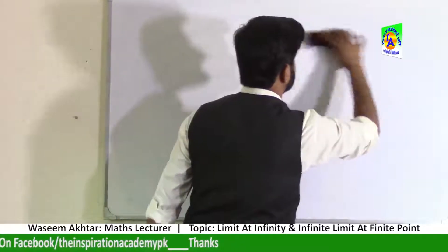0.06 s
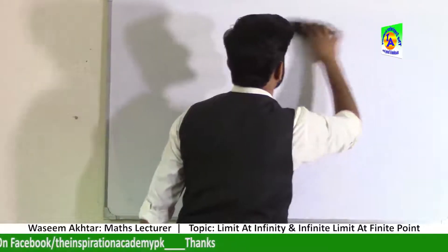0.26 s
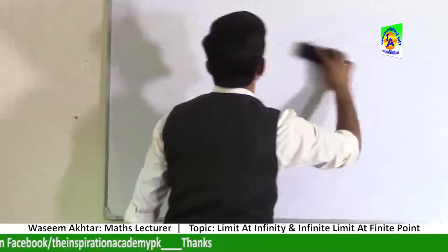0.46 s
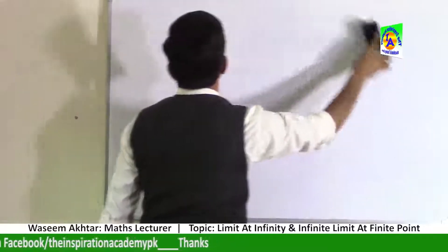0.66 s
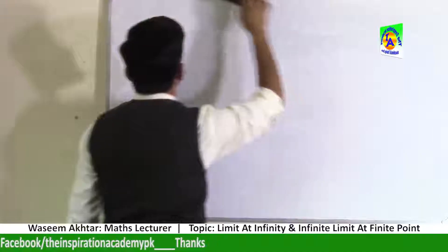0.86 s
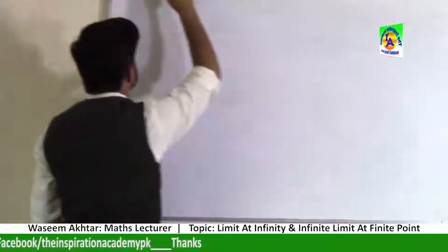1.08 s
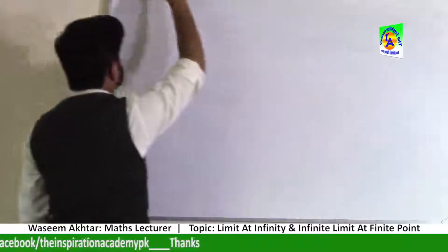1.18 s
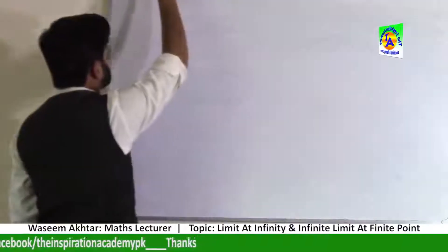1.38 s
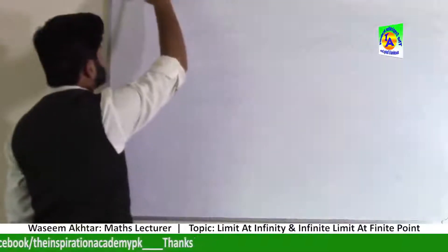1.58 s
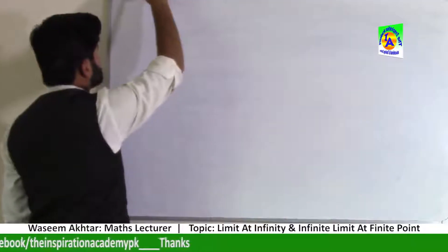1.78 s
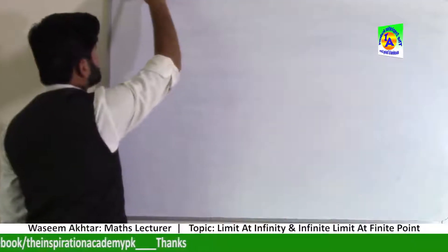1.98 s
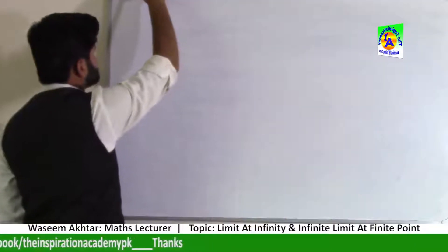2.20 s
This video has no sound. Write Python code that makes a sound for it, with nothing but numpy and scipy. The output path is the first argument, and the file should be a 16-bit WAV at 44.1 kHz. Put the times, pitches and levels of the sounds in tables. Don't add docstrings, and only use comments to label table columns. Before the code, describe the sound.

A felt eraser rubs a whiteboard in quick fizzing strokes, then one sharp hollow knock.

```python
import sys
import numpy as np
from scipy import signal
from scipy.fft import rfft, irfft, next_fast_len
from scipy.io import wavfile
from scipy.ndimage import uniform_filter1d, map_coordinates

SR = 44100
rng = np.random.default_rng(int(sys.argv[2]) if len(sys.argv) > 2 else 0)


def generate_wav(signal):
    frames = np.transpose(np.atleast_2d(signal))
    scaled = np.clip(frames, -1, 1) * 32767
    pcm = np.round(scaled).astype(np.int16)
    wavfile.write(sys.argv[1], SR, pcm)


def gain_from_db(level_db):
    decades = np.asarray(level_db, float) / 20
    return 10 ** decades


N = 98960
T = np.arange(N) / SR


def unit(x):
    return x / np.sqrt(np.mean(x ** 2) + 1e-20)


def coloured(x, response):
    size = next_fast_len(N + 8192)
    freq_hz, gain_db = np.transpose(response)
    log_hz = np.log(np.fft.rfftfreq(size, 1 / SR) + 1)
    gain = gain_from_db(np.interp(log_hz, np.log(freq_hz + 1), gain_db))
    return irfft(rfft(x, size) * gain, size)[..., :N]


def white():
    return rng.standard_normal(N)


def bell(middle_s, half_width_s):
    return np.exp(-.5 * ((T - middle_s) / half_width_s) ** 2)


def wobble(rate_hz):
    knots = rng.standard_normal(int(N * rate_hz / SR) + 4)
    return map_coordinates(knots, [T * rate_hz])


def patchy(x, patchy_db):
    z = signal.stft(x, nperseg=512)[2]
    field = uniform_filter1d(rng.standard_normal(z.shape), size=6, axis=0)
    field = uniform_filter1d(field, size=8, axis=1)
    return signal.istft(z * gain_from_db(patchy_db * unit(field)), nperseg=512)[1][:N]


# freq_hz, level_db
SIDE = [(60, -26.5), (240, -23), (950, -19), (3770, -15.5), (15000, -15)]


def wide(make):
    mid = make()
    side = coloured(make(), SIDE)
    return np.array([mid + side, mid - side])


def wide_noise(make, response):
    return unit(wide(lambda: coloured(make(), response)))


def ring(start_s, level_db, pitch_hz, t60_s, rise_s=.0004):
    t = np.maximum(T - start_s, 0)
    return gain_from_db(level_db - 60 * t / t60_s) * (1 - np.exp(-t / rise_s)) * np.sin(2 * np.pi * pitch_hz * t)


def felt_grains():
    grains_per_s, grain_db, grain_share = 5000, 3.5, 0.54
    draw = rng.random((2, N))
    size = gain_from_db(-grain_db * np.log(draw[1] + 1e-4))
    slips = (draw[0] < grains_per_s / SR) * size * rng.choice([-1, 1], N)
    return patchy(grain_share * unit(slips) + white(), patchy_db=1.5)


# time_s, effort_db
RUB = [
    (0, -48),
    (.075, -49),
    (.16, -56),
    (.24, -50.5),
    (.31, -55),
    (.53, -53.5),
    (.595, -54),
    (0.689, -53),
    (0.869, -81.5),
]
# middle_s, half_width_s, level_db
SCUFFS = [
    (0.126, 0.0055, -44),
    (.341, 0.0079, -42),
]
# freq_hz, density_db
FELT = [(2350, -23), (4000, -11.5), (4750, -15.5), (5390, -10), (5880, -12.5), (6830, -4), (9640, 0.5),
        (13600, -2), (15800, -14)]
# freq_hz, density_db
SCUFF = [(4500, -24), (5600, -7.5), (7000, -1.5), (9500, -3), (13500, 0.5), (15800, -4)]
# freq_hz, density_db
SQUEAK = [(4200, -30), (5000, -3), (5400, 0), (5900, -6), (6500, -30)]
# freq_hz, density_db
BOARD = [(290, -29.5), (500, -13.5), (578, -8.5), (742, -11), (1190, -0.5), (2350, -4), (6000, -9),
         (7800, -34), (13200, -120)]


def rubbing():
    time_s, stroke_db = np.transpose(RUB)
    effort_db = np.interp(T, time_s, stroke_db, right=-120) + 0.83 * wobble(30.3)
    scuffs = np.zeros(N)
    for middle_s, half_width_s, level_db in SCUFFS:
        effort_db = effort_db - 0.5 * bell(middle_s - 0.021, 0.013)
        scuffs = scuffs + gain_from_db(level_db) * bell(middle_s, half_width_s)

    fizz = wide_noise(felt_grains, FELT) * gain_from_db(effort_db)
    fizz = fizz + wide_noise(felt_grains, SCUFF) * scuffs
    squeak_db, squeak_end_s, squeak_fade_s = -64.5, 0.14, 0.078
    squeak_fall = np.clip((squeak_end_s - T) / squeak_fade_s, 0, 1)
    squeak = wide_noise(felt_grains, SQUEAK) * gain_from_db(squeak_db) * squeak_fall

    board_db, board_follows, scuff_board_db = -69, 0.39, -22.5
    drive = gain_from_db(board_db + board_follows * (effort_db + 52.5)) * (T < time_s[-1])
    board = wide_noise(felt_grains, BOARD) * np.hypot(drive, gain_from_db(scuff_board_db) * scuffs)
    return fizz + squeak + board


HISS_FALL_DB, HISS_FALL_S = -4.5, 1.85
# freq_hz, density_db
RUMBLE = [(12, -54), (20, -15), (32, -2.5), (53, 0), (81, -13.5), (118, -6), (180, -15.5), (437, -25),
          (500, -29), (650, -45), (1100, -120)]
# time_s, level_db
RUMBLE_SWELL = [(0.0, -59.5), (0.3, -59), (0.64, -57), (0.79, -61.5), (1.02, -59), (1.3, -58.5),
                (1.54, -62.5), (2.24, -62)]
# freq_hz, density_db
HISS = [(240, -23), (400, -27.5), (512, -3), (597, -4), (1500, -6.5), (2110, -10), (12000, -17),
        (15800, -18)]
# freq_hz, gain_db
BUZZ = [(2000, -14), (4000, -7.5), (6500, -0.5), (12000, -11.5), (15800, -15)]


def noise_floor():
    rumble_db, hiss_db = 0.5, -73
    swell = gain_from_db(rumble_db + np.interp(T, *np.transpose(RUMBLE_SWELL)))
    rumble = swell * wide_noise(lambda: patchy(white(), 2.37), RUMBLE)
    fall = gain_from_db(HISS_FALL_DB * (T > HISS_FALL_S) + 0.5 * wobble(8.13))
    hiss = fall * gain_from_db(hiss_db) * wide_noise(lambda: patchy(white(), 2.27), HISS)

    buzz_start_s, mains_hz, buzz_db = .009, 100.05, -82.5
    spikes = np.zeros(N)
    at = (np.arange(buzz_start_s, T[-1], 1 / mains_hz) * SR).astype(int)
    spikes[at] = gain_from_db(2.5 * rng.standard_normal(len(at)))
    buzz = gain_from_db(buzz_db) * unit(coloured(spikes, [(500, -70.5), *BUZZ]))
    return rumble + hiss + buzz


def mains_hum():
    hum_hz, hum_db = 50, -62
    return gain_from_db(hum_db + 2.5 * wobble(19)) * np.sin(2 * np.pi * (hum_hz * T + 0.16 * wobble(11)))


# middle_s, half_width_s, level_db
SLIDES = [
    (1.248, 0.061, -71.5),
    (1.618, 0.011, -63),
    (1.68, 0.029, -67.5),
    (1.72, 0.029, -60),
]
# freq_hz, density_db
SLIDE = [(500, -15.5), (1200, 0.5), (2500, -5.5), (4000, -11), (7500, -7.5), (12000, -9.5), (15800, -14)]


def slides():
    swell = sum(gain_from_db(level_db) * bell(middle_s, half_width_s) for middle_s, half_width_s, level_db in SLIDES)
    return swell * wide_noise(lambda: patchy(white(), patchy_db=4.5), SLIDE)


# start_s, level_db, pitch_hz, t60_s
SWINGS = [
    (1.158, -48.5, 107, 0.21),
    (1.183, -42, 68.7, 0.2),
    (1.213, -36.5, 42.7, 0.23),
    (1.244, -42, 63, 0.11),
    (1.281, -42, 35.6, 0.27),
]


def thump():
    return -sum(ring(*swing, rise_s=0.003) for swing in SWINGS)


# start_s, level_db, rise_s, t60_s
THUDS = [
    (1.194, -43.5, 0.0016, 0.0094),
    (1.197, -55.5, 0.0029, .16),
    (1.612, -49.5, 0.0026, 0.096),
    (1.7224, -33, 0.0027, .05),
    (1.727, -48.5, 0.0035, 0.32),
]
# freq_hz, density_db
WOOD = [(80, -8), (250, 4.5), (600, -0.5), (1100, 2.5), (2200, -7), (3500, -19), (8000, -23.5),
        (15800, -35.5)]


def thuds():
    total = np.zeros(N)
    for start_s, level_db, rise_s, t60_s in THUDS:
        t = np.maximum(T - start_s, 0)
        shape = gain_from_db(level_db - 60 * t / t60_s) * (1 - np.exp(-(t / rise_s) ** 2))
        total = total + shape * unit(coloured(white(), WOOD))
    return total


def snap():
    start_s, level_db, t60_s = 1.1942, -49.5, 0.009
    return (T > start_s) * gain_from_db(level_db - 60 * np.abs(T - start_s) / t60_s) * white()


# start_s, level_db, pitch_hz, t60_s
TICKS = [
    (1.1945, -44, 3250, .01),
    (1.1945, -48.5, 400, .03),
    (1.612, -47.5, 257, 0.034),
    (1.6155, -49, 1050, .04),
    (1.6155, -54, 850, .03),
    (1.621, -54, 1950, .06),
    (1.7222, -33.5, 2090, .01),
    (1.722, -42.5, 190, .06),
]


def ticks():
    return sum(ring(*tick) for tick in TICKS)


def knock():
    middle_s, level_db, pitch_hz, half_width_s = 1.7248, -17.5, 983, 0.0014
    return gain_from_db(level_db) * bell(middle_s, half_width_s) * np.sin(2 * np.pi * (pitch_hz * (T - middle_s) + 0.46))


# pitch_hz, level_db, t60_s
LEDGE = [(419, -17, 0.061), (1670, -5, .03), (1950, -7.5, .03), (2950, -11.5, 0.027), (4603, -15, 0.034),
         (5250, -10.5, 0.032), (6400, -11, .025), (7680, -15, 0.031), (9300, -26.5, 0.052)]


def rattle():
    start_s, rattle_db, rough_hz = 1.7225, -30, 120
    total = ring(1.727, -42.5, 12900, 0.011)
    for pitch_hz, level_db, t60_s in LEDGE:
        mode = ring(start_s, rattle_db + level_db, pitch_hz, t60_s, rise_s=0.0013)
        total = total + mode * (1 + 0.17 * wobble(rough_hz))
    return total


# delay_s, level_db
ECHOES = [(.0085, -20), (.013, -28.5), (0.0254, -25.5), (.038, -25), (.06, -30.5)]


def walls(x):
    def late(delay_s):
        return np.pad(x, (int(delay_s * SR), 0))[:N]
    echo = sum(gain_from_db(level_db) * late(delay_s) for delay_s, level_db in ECHOES)
    hit_side_db = -28
    return x + echo + gain_from_db(hit_side_db) * np.outer([1, -1], late(.0002) + echo)


# freq_hz, t60_s
ROOM = [(200, 0.76), (1000, 0.67), (3000, 0.23), (10000, .12), (16000, .08)]


def room(x):
    room_db, delay_s = -14, .006
    hz, t, z = signal.stft(wide(white)[:, :SR // 2], SR, nperseg=256)
    t60_s = np.interp(hz, *np.transpose(ROOM))[:, None]
    tail = signal.istft(z * gain_from_db(-60 * t / t60_s), SR, nperseg=256)[1]
    late = np.pad(x, (int(delay_s * SR), 0))[None]
    return gain_from_db(room_db) * signal.fftconvolve(late, tail / np.linalg.norm(tail[0]), axes=1)[:, :N]


def scene():
    knock_feed_db = -18
    contacts, pulse = ticks() + thuds() + rattle(), knock()
    hits = walls(contacts + pulse + snap())
    tail = room(contacts + gain_from_db(knock_feed_db) * pulse)
    return rubbing() + noise_floor() + mains_hum() + slides() + thump() + hits + tail


# freq_hz, level_db
BAR = [(700, -7), (2000, -3), (3200, -1), (6000, -4), (10000, -2), (15500, 0)]
# middle_s, rise_db
SHORT = [(.872, 3), (.93, 3), (.96, 4), (.985, 5), (1.05, 2), (1.3, 3), (1.46, 4), (1.52, 2), (1.57, 5),
         (1.81, 5), (1.835, 5), (1.86, 4), (1.98, 12), (2.065, 11), (2.11, 6), (2.15, 10), (2.195, 11),
         (2.21, 10)]


def dropouts(x):
    lost_db, waver_db, waver_hz, ragged_db, short_s = -22, 1.1, 18, 1.3, .008
    hz, t, z = signal.stft(x, SR, nperseg=1024, noverlap=512)
    band = np.arange(len(hz)) // 16
    power = np.add.reduceat(np.abs(z.sum(0)) ** 2, np.arange(0, len(hz), 16))
    power = uniform_filter1d(power, size=2, axis=1)
    level_db = 10 * np.log10(power + 1e-20)[band]

    bar_db = np.percentile(level_db, 25, axis=1) + np.interp(hz, *np.transpose(BAR), left=-99)
    rise_db = waver_db * wobble(waver_hz)[np.minimum(t * SR, N - 1).astype(int)]
    rise_db = rise_db + HISS_FALL_DB * (t > HISS_FALL_S)
    for middle_s, short_db in SHORT:
        rise_db = rise_db + short_db * np.exp(-.5 * ((t - middle_s) / short_s) ** 2)
    ragged = uniform_filter1d(rng.standard_normal(power.shape), size=3, axis=1)
    lost = level_db < bar_db[:, None] + rise_db + ragged_db * unit(ragged)[band]
    return signal.istft(z * gain_from_db(lost_db * lost), SR, nperseg=1024, noverlap=512)[1][:, :N]


def top_cut(x):
    return signal.sosfilt(signal.butter(12, 16180, fs=SR, output="sos"), x)


# freq_hz, gain_db
TOP = [(15700, 0), (15900, -60), (16200, -120)]


def record(dry):
    left_db = -0.14
    balance = gain_from_db([[left_db / 2], [-left_db / 2]])
    mix = coloured(dropouts(dry), TOP) * balance
    return top_cut(mix)


dry = scene()
out = record(dry)
generate_wav(out)
```